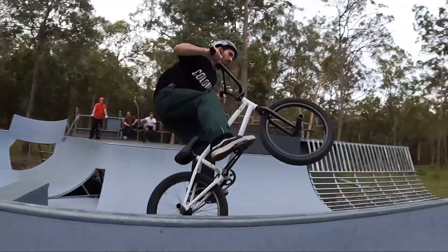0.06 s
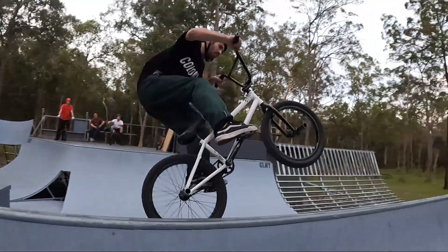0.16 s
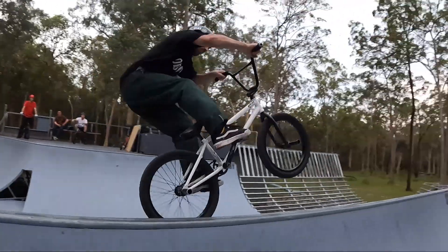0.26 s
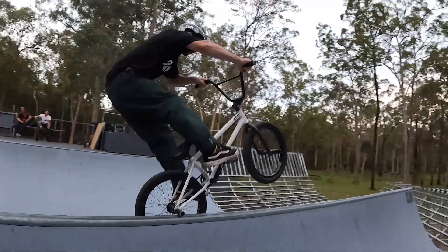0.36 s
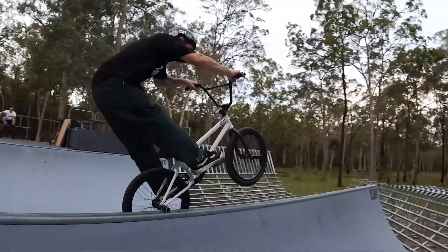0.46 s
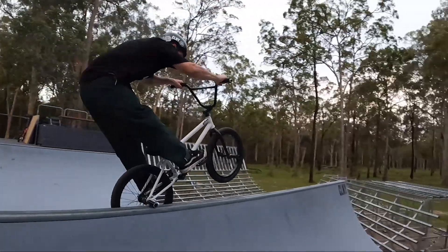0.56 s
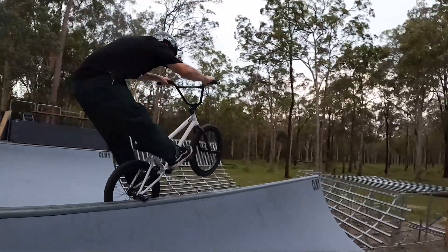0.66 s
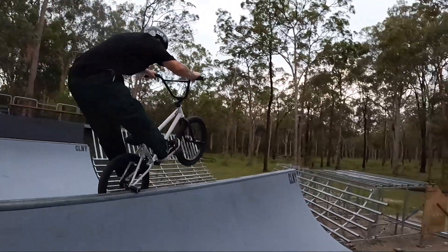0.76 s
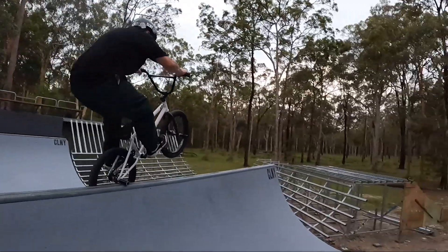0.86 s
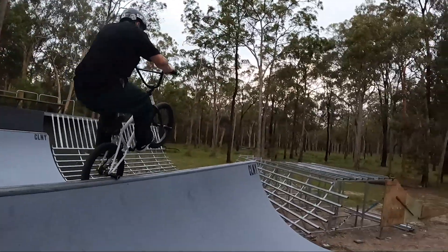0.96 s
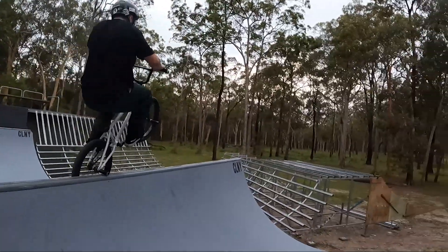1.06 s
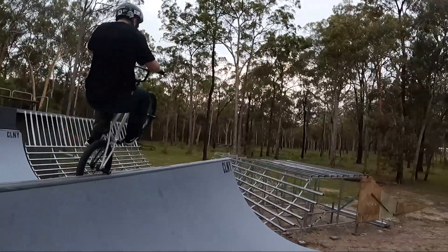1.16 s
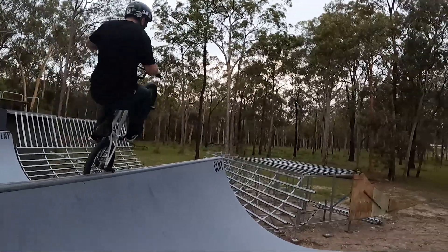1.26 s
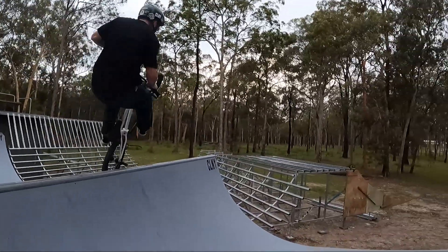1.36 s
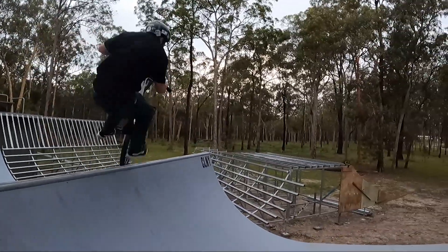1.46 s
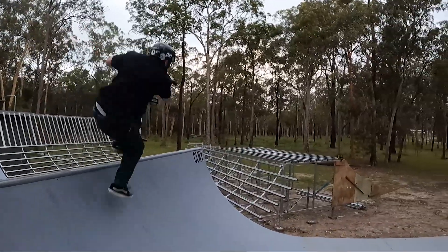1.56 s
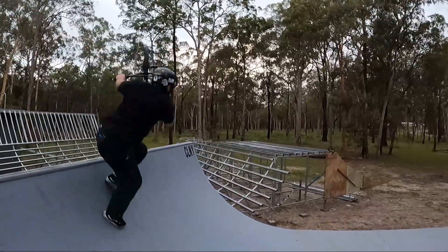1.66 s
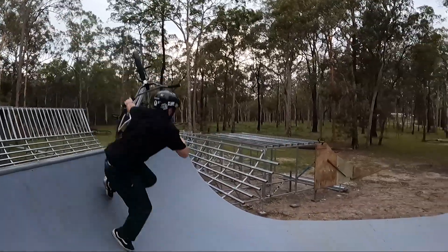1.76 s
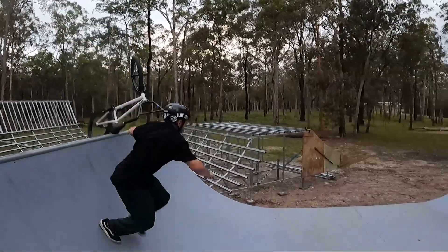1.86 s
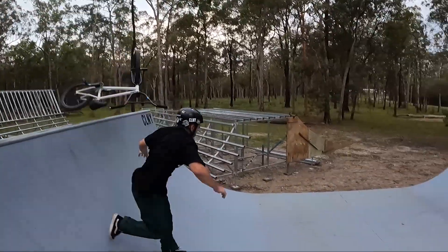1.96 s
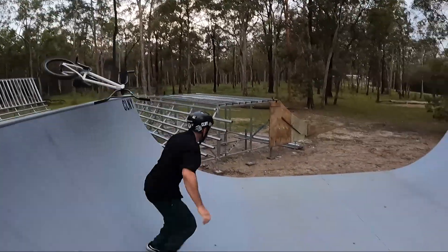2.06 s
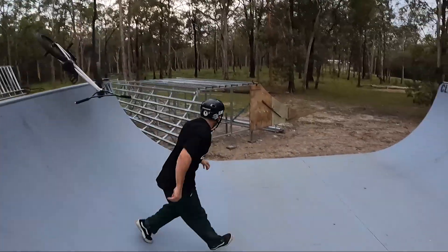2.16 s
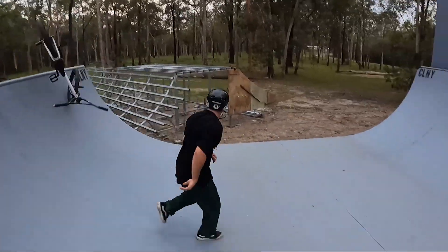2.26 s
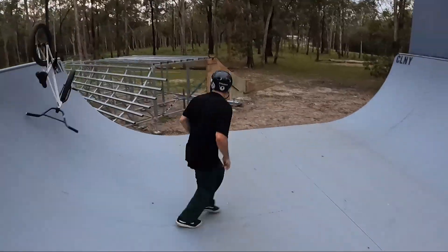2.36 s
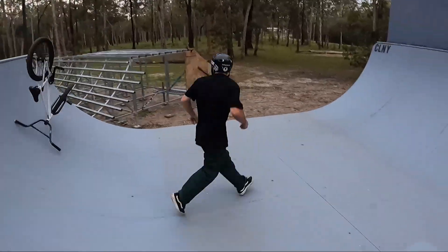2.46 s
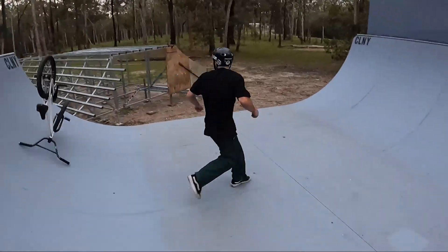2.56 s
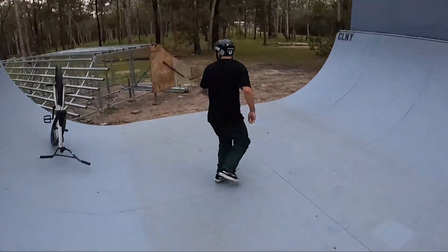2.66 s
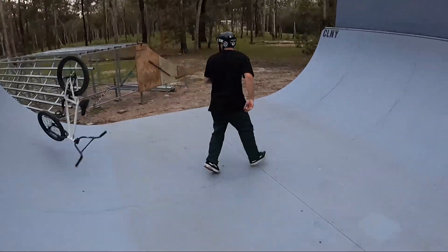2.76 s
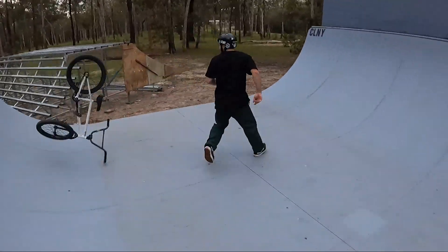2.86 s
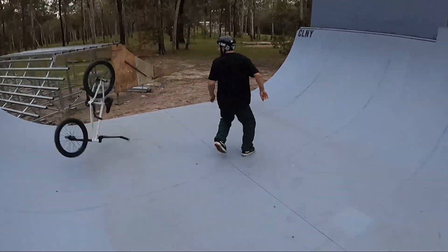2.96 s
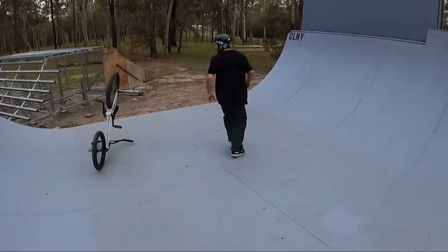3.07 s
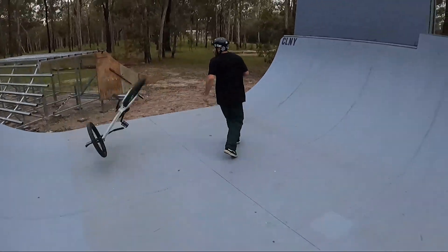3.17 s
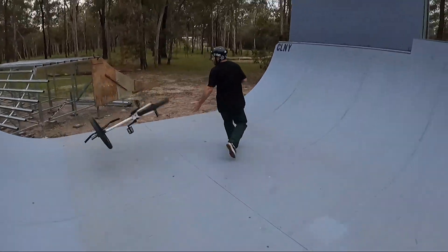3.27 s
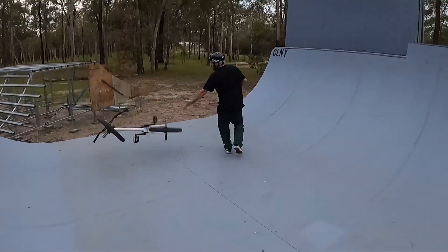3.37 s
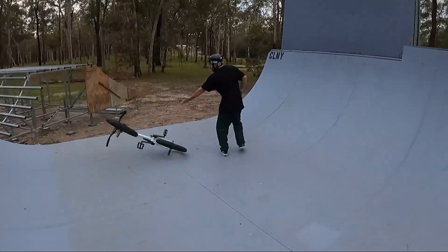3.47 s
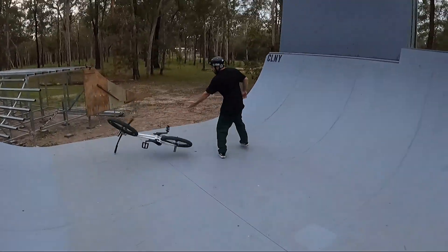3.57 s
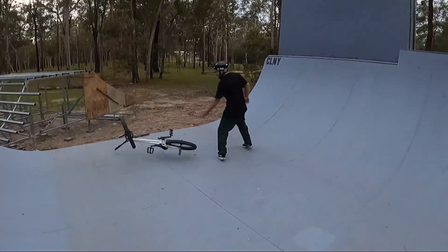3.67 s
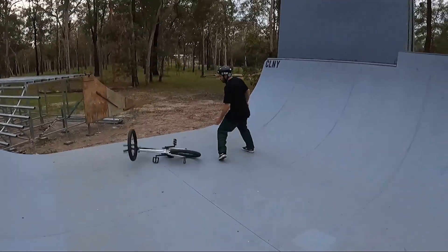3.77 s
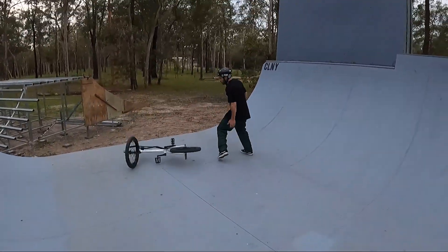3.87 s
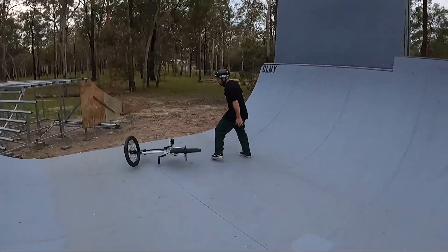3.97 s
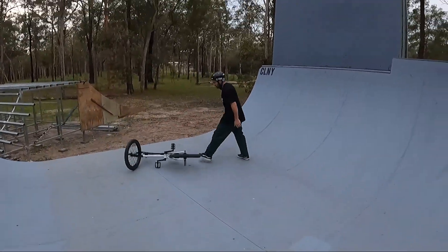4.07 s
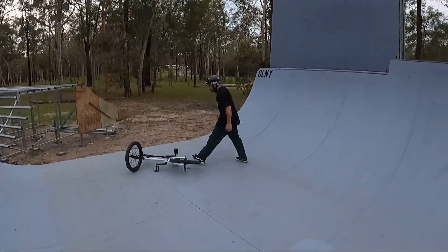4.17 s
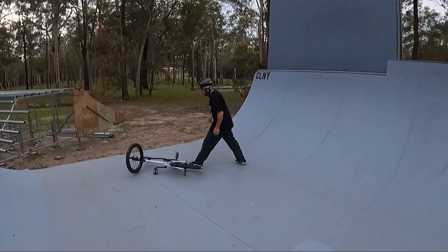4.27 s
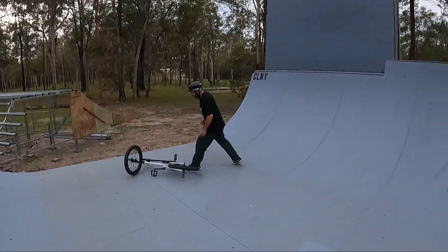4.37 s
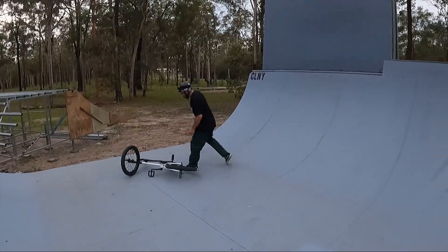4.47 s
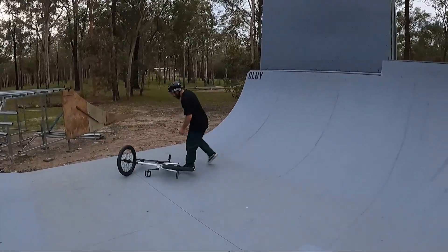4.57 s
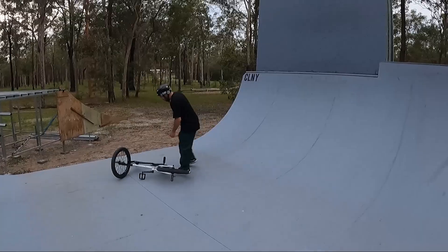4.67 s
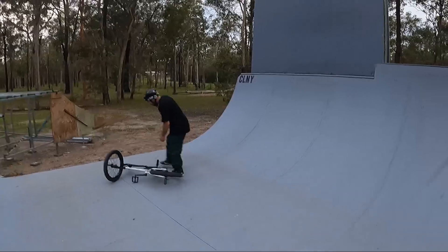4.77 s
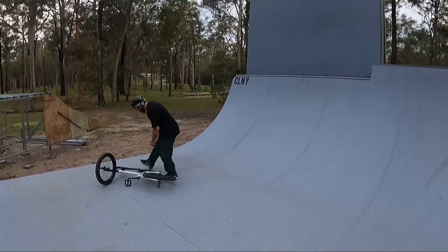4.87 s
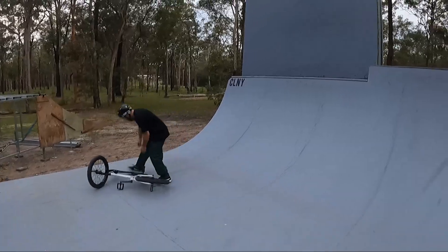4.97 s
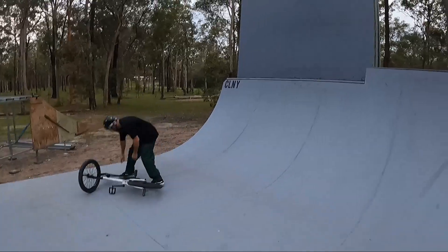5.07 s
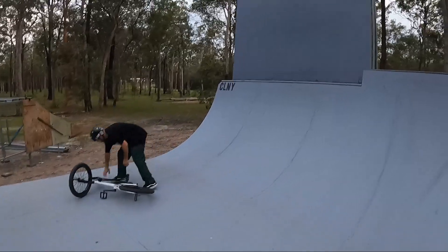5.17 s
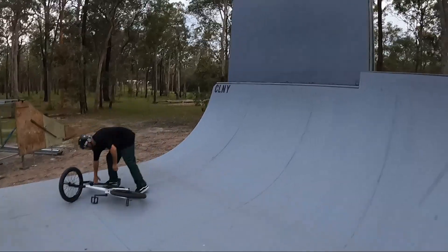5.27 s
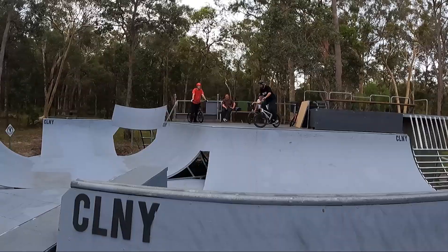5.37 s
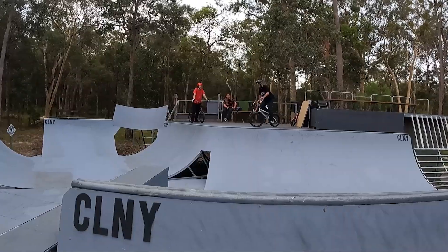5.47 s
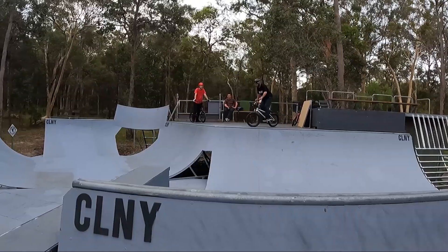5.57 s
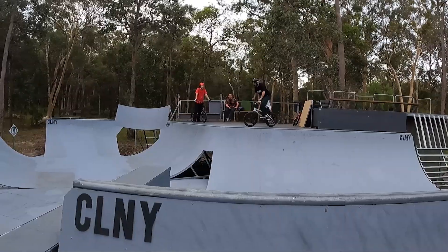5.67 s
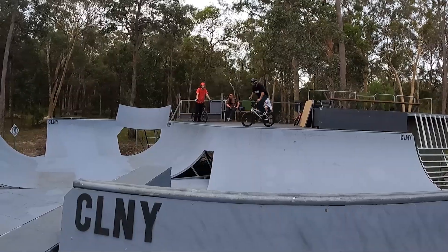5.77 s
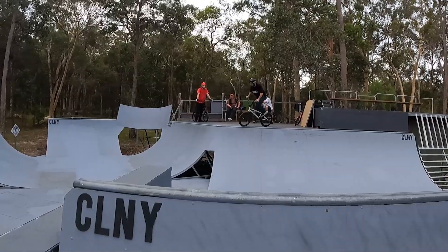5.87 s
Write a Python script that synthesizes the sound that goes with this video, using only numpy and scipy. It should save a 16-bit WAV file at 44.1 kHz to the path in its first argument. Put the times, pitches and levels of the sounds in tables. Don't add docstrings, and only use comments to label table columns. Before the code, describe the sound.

A small bike slaps onto a plywood ramp, squeaks, then gets dropped and tumbles down with hard clattering bangs while cicadas sing faintly.

```python
import sys
import numpy as np
from scipy import signal
from scipy.fft import rfft, irfft, next_fast_len
from scipy.io import wavfile
from scipy.ndimage import uniform_filter1d, minimum_filter1d

SR = 44100
rng = np.random.default_rng(int(sys.argv[2]) if len(sys.argv) > 2 else 0)


def int16_out(signal):
    q = np.round(np.clip(np.atleast_2d(signal).T, -1, 1) * 32767)
    wavfile.write(sys.argv[1], SR, q.astype(np.int16))


def attenuation_scalar(level_db):
    decades = np.asarray(level_db, float) / 20
    return 10 ** decades


N = 261513


def evened(x):
    return x / np.sqrt(np.mean(x ** 2) + 1e-20)


def wavering(noise, size):
    return evened(uniform_filter1d(uniform_filter1d(noise, size=size), size=size))


def read(points, hz):
    f, value = np.transpose(points)
    return np.interp(np.log(hz + .1), np.log(f + .1), value)


def curve(rows):
    s, db = np.transpose(rows)
    return np.interp(np.arange(N) / SR, s, db)


def passing(rows):
    s, db = np.transpose(rows)
    return attenuation_scalar(np.interp(np.arange(N) / SR, s, db, left=-200, right=-200))


def add(mix, s, sound):
    part = mix[round(s * SR):][:len(sound)]
    part += sound[:len(part)]


def coloured(x, spectrum):
    size = next_fast_len(x.shape[-1])
    gain = attenuation_scalar(read(spectrum, np.fft.rfftfreq(size, 1 / SR)))
    return evened(irfft(rfft(x, size) * gain, size)[..., :x.shape[-1]])


def grains(per_s, spread_db):
    present = rng.random(N) < per_s / SR
    size_db = spread_db * np.minimum(rng.exponential(1, N), 4)
    return present * rng.standard_normal(N) * attenuation_scalar(size_db)


def dying(t, t60, rise_s):
    return (1 - np.exp(-t / rise_s)) * attenuation_scalar(-60 * t / t60)


# (time [s], level [dB])
BREEZE = [(0, -28), (.3, -24), (1, -28), (1.7, -39), (2.2, -35), (3.9, -37), (4.6, -24), (5.1, -31.5),
          (5.92, -36)]
# (frequency [Hz], density [dB per Hz])
GUSTS = [(.5, -11.5), (3, -1.5), (6, -2), (12, -23.5), (25, -29.5), (50, -45.5), (120, -66.5), (400, -88)]
CHANGE_S, CHANGE_DB = 5.357, -35


def breeze():
    t = np.arange(N) / SR - CHANGE_S
    before = -.7 * np.exp(np.minimum(t, 0) / 0.044) * (t < 0)
    after = .3 * np.exp(-np.maximum(t, 0) / 0.039) * (t >= 0)
    gusts = attenuation_scalar(curve(BREEZE)) * coloured(rng.standard_normal(N), GUSTS)
    return gusts - attenuation_scalar(CHANGE_DB) * (before + after)


# (time [s], level [dB])
CICADAS = [
    [(0.0, -47.5), (4.54, -53.5), (5.35, -51.5)],
    [(5.362, -46), (5.92, -46.5)],
]
# (frequency [Hz], density [dB per Hz])
CHORUS = [(3300, -50), (3840, -28), (4410, -11), (5360, -36.5), (6020, -6), (6910, 6), (8560, -18),
          (14500, -40)]
# (frequency [Hz], density [dB per Hz])
HUSH = [(60, -40), (150, -30), (700, -47), (1300, -34), (2020, -33), (3040, -24), (3900, -38), (16000, -50)]


def cicadas():
    drift = evened(uniform_filter1d(rng.standard_normal(N), 9000))
    throb_hz = 69 * (1 + 0.015 * drift)
    throb_db = 2.5 * np.cos(2 * np.pi * np.cumsum(throb_hz) / SR)
    clicks = evened(grains(per_s=8400, spread_db=-4.2)) * attenuation_scalar(throb_db)
    song = coloured(clicks + .7 * rng.standard_normal(N), CHORUS)
    hush = attenuation_scalar(-24.5) * coloured(rng.standard_normal(N), HUSH)
    return attenuation_scalar(curve(np.vstack(CICADAS)) - 4.0) * (song + hush)


# (frequency [Hz], t60 [s])
WOODS = [(60, 1), (250, 0.34), (1000, 0.45), (4000, 0.42), (6500, .25), (12000, 0.067)]


def woods(x):
    taps = np.zeros(SR)
    at = np.arange(300, SR - 20, 20)
    taps[at + rng.integers(0, 20, len(at))] = rng.choice([-1., 1.], len(at))
    hz, t, z = signal.stft(taps, SR, nperseg=512)
    decay = attenuation_scalar(-60 * t / read(WOODS, hz)[:, None])
    tail = signal.istft(z * decay, SR, nperseg=512)[1]
    return signal.fftconvolve(x, tail / np.linalg.norm(tail))[:N]


# (time [s], level [dB])
FREEWHEEL = [(1.85, -70), (2.5, -68), (3.2, -62), (3.3, -54), (3.52, -58), (3.62, -53), (3.85, -56),
             (4.35, -68)]
PAWLS_PER_S = 88


def freewheel():
    unevenness = .2 * evened(uniform_filter1d(rng.standard_normal(N), size=2000))
    turns = np.cumsum(PAWLS_PER_S * (1 + unevenness)) / SR
    ticks = (.4 + np.exp(-(turns % 1) / .12)) * rng.standard_normal(N)
    spectrum = [(3000, -22), (5500, -6), (8500, -2), (11000, -4), (15000, -9)]
    return coloured(ticks, spectrum) * passing(FREEWHEEL)


# (frequency [Hz], density [dB per Hz])
RUMBLE = [(15, -33), (30, 11), (70, -6), (130, -15), (250, -20), (500, -52)]
HUM = [(200, -26), (350, -2), (600, -1), (900, -3.5), (1300, -25), (1900, -44)]
SCRAPE = [(900, -11), (1500, -4), (2400, -5), (3500, -7), (5500, -6), (9000, -10.5), (15000, -25.5)]
# (frequency [Hz], width [Hz], level [dB])
TREAD = [(500, 22, 2), (630, 30, -1), (760, 40, -6), (1050, 35, -8), (1560, 35, -8), (1910, 35, -11),
         (2750, 80, -10)]
# (time [s], level [dB])
MOTION = [(0, -64), (.4, -72), (.56, -44), (1.0, -55), (1.3, -47.5), (1.52, -57), (1.76, -70), (1.95, -59),
          (2.41, -54), (2.77, -47), (3.02, -57), (3.33, -45.5), (3.61, -56), (3.86, -53), (4.42, -50),
          (4.62, -66), (5.0, -71), (5.92, -73)]
BAIL_S = 1.76
RIDDEN_DB, DRAGGED_DB = (4, -5, -5), (11, -3.5, -1)
UNLOADED_DB = -8
SWAY_DB, SWAY_T60 = -29, 1.0


def rolling():
    loose = np.clip((np.arange(N) / SR - BAIL_S) * 10, 0, 1)
    motion_db = curve(MOTION)
    rumble_db, hum_db, scrape_db = (
        motion_db + ridden + (dragged - ridden) * loose for ridden, dragged in zip(RIDDEN_DB, DRAGGED_DB))

    sway_power, t = np.zeros(N), np.arange(SR) / SR
    for s, boom_db, _ in SLAPS + THUDS:
        add(sway_power, s, attenuation_scalar(boom_db + 2 * SWAY_DB) * dying(t, SWAY_T60, .03))
    rumble = np.sqrt(attenuation_scalar(2 * rumble_db) + sway_power) * coloured(rng.standard_normal(N), RUMBLE)

    hum, t = coloured(rng.standard_normal(N), HUM), np.arange(4096) / SR
    for hz, width, db in TREAD:
        wander = attenuation_scalar(2.0 * evened(uniform_filter1d(rng.standard_normal(N), 4000)))
        mode = np.sin(2 * np.pi * hz * t) * np.exp(-np.pi * width * t)
        rung = evened(signal.oaconvolve(grains(per_s=300, spread_db=2), mode)[:N])
        hum = hum + attenuation_scalar(db - 5 + UNLOADED_DB * loose) * wander * rung

    scrape = coloured(grains(per_s=7600, spread_db=0.5), SCRAPE)
    return rumble + attenuation_scalar(hum_db) * hum + attenuation_scalar(scrape_db) * scrape


# (start [s], hardest [s], end [s], level [dB], level at both ends [dB])
SKIDS = [(.28, .47, .48, -56, -70), (1.21, 1.226, 1.3, -47, -63), (1.36, 1.406, 1.44, -42, -72),
         (1.725, 1.81, 1.87, -33, -43), (5.09, 5.13, 5.3, -68, -78)]


def skids():
    spectrum = [(800, -14), (1700, 1), (2500, 3.5), (3600, -1), (6000, -13), (11000, -23.5), (15000, -29.5)]
    grit = coloured(grains(per_s=4400, spread_db=1.0), spectrum)
    out = np.zeros(N)
    for start, hardest, end, db, ends_db in SKIDS:
        t = np.arange(start, end, 1 / SR)
        pressure = attenuation_scalar(np.interp(t, [start, hardest, end], [ends_db, db, ends_db]))
        add(out, start, pressure * signal.windows.tukey(len(t), .15))
    return out * grit


# (time [s], level [dB])
GRIND = [(1.385, -56), (1.42, -41), (1.432, -60)]


def grind():
    spectrum = [(3000, -16.5), (5500, 9), (9000, 8), (11000, -5), (14000, -2)]
    return coloured(grains(per_s=5000, spread_db=2.8), spectrum) * passing(GRIND)


# (time [s], hold [s], settled pitch [Hz], level [dB], first grip above that pitch [Hz])
SQUEAKS = [(.376, .042, 5680, -33, -120), (.527, .014, 4900, -39, 900), (1.122, .012, 5780, -44, 600),
           (1.204, .006, 5820, -32, 350), (1.283, .008, 5990, -36, 450), (1.879, .001, 5200, -46, 220),
           (2.352, .001, 5350, -38, -400), (2.364, .001, 5160, -38, 80)]
GRIP_S, GRIP_DB, LET_GO_DB_PER_S = .006, -22, 2200
SETTLE = .4


def squeaks():
    out, t = np.zeros(N), np.arange(4096) / SR
    for s, hold, hz, db, grip_hz in SQUEAKS:
        noise = rng.standard_normal((3, len(t)))
        grip = GRIP_S + .15 * hold
        end = grip + hold
        waver, flutter = (wavering(v, 30) for v in noise[:2])
        stutter = evened(uniform_filter1d(noise[2], size=300))
        pitch_hz = (hz + grip_hz * np.exp(-t / (SETTLE * end))) * (1 + 0.015 * waver)
        turn = 2 * np.pi * np.cumsum(pitch_hz) / SR
        octave = attenuation_scalar(-28) * np.sin(2 * turn) * np.clip(1 + 0.55 * flutter, 0, 3)
        shape_db = GRIP_DB * np.maximum(1 - t / grip, 0) - LET_GO_DB_PER_S * np.maximum(t - end, 0)
        level = attenuation_scalar(db + shape_db + 9.5 + 0.6 * flutter + 2.5 * stutter)
        add(out, s, level * (np.sin(turn) + octave) * np.minimum(t * 1000, 1))
    return out


LANDING_S = .479
# (frequency [Hz], level [dB], t60 [s])
TUBES = [(1500, -13, .06), (1770, -8, .07), (2060, -13, .099), (4980, -21.5, .15), (7290, -14, .068),
         (13180, -22, .07), (1594, -53, 1.5), (2720, -52, 1.2), (4750, -42, .94)]
# (time
# [s], frequency [Hz], level [dB], t60 [s])
TAPS = [(2.958, 178, -15, .16), (.301, 2580, -56, .025), (.366, 385, -51, .38), (.74, 4900, -45, .17),
        (.841, 2420, -45, .025), (1.235, 4820, -47, .44), (1.419, 7200, -30.5, .081),
        (1.425, 12060, -51, .3), (1.717, 564, -19, .03), (1.749, 957, -16.5, .017),
        (1.864, 926, -26.5, .02), (2.54, 121, -14, .4), (3.11, 180, -15, .15), (3.668, 5680, -38, .046),
        (1.395, 310, -42, .12), (3.961, 1790, -52.5, .072), (4.5, 101.9, -39.5, 2.24),
        (4.964, 2100, -35, .007), (4.964, 3200, -41, .007), (5.058, 430, -44, .05), (5.175, 467, -50, .032),
        (5.278, 4900, -63, .065), (5.296, 5350, -57, .06), (.53, 1030, -44, .9), (.53, 640, -41, 1.2),
        (.6, 510, -45, 1.5), (1.215, 500, -44, .5), (1.29, 490, -42, .6), (1.24, 175, -40, .12),
        (1.245, 900, -48, .1), (1.41, 135, -40, .1), (1.4, 560, -42, .1), (1.37, 1550, -50, .3),
        (1.62, 610, -58, .8), (3.11, 800, -15, .06), (3.27, 610, -45, .9), (3.563, 4867, -30, .25),
        (3.563, 393, -21, .24), (3.563, 258, -16, .3), (3.728, 4500, -51, .12), (4.589, 700, -40, .04),
        (4.69, 930, -64, .6), (2.118, 248, -14, .18), (2.118, 151, -20, .45), (.8, 1520, -59, .8),
        (.49, 155, -20, .55), (.485, 250, -12, .2), (2.542, 358, -13, .16), (2.59, 128, -18, .2),
        (2.352, 200, -24, .15), (2.114, 950, -20, .04), (5.062, 320, -54, .12), (1.28, 300, -48, .15),
        (3.24, 2112, -50, 4), (3.24, 4511, -50, 1.1)]
RATTLES = [(1.228, 2900, -41, .06), (1.403, 4740, -40, .06), (1.415, 13620, -40, .063),
           (3.562, 420, -12, .12), (3.565, 4544, -37, .13), (3.113, 9000, -33, .06),
           (3.177, 9000, -25, .02), (3.168, 5600, -24, .04), (3.237, 1450, -22, .1), (3.2, 511, -22, .15),
           (3.2, 2374, -24, .075), (.505, 1800, -22, .06), (.53, 2650, -54, .8), (.53, 5200, -47, .5),
           (4.6, 580, -63, 1.2)]
TIGHT, LOOSE = .18, .7


def frame():
    out, longest = np.zeros(N), 2 * SR // 3
    landing = [(LANDING_S, *mode) for mode in TUBES]
    for rows, rough in (landing + RATTLES, LOOSE), (TAPS, TIGHT):
        for s, hz, db, t60 in rows:
            t = np.arange(min(longest, 2048 + round(t60 * SR))) / SR
            a, b = (wavering(v, round(90 / rough)) for v in rng.standard_normal((2, len(t))))
            shake = 1 - rough + rough * (a + 1j * b) * 1.6
            ring = (shake * np.exp(2j * np.pi * hz * t)).imag
            add(out, s, attenuation_scalar(db) * ring * dying(t, t60, 0.00072))
    return out


# (frequency [Hz], level [dB], t60 [s])
PANELS = [(45, -4, .4), (71.8, -6.5, 0.69), (96, -1.5, 0.43), (120.4, 1.5, 0.23), (155, 0, 0.31),
          (200.6, -4, .3), (234, 4, 0.13), (289.5, -6.5, 0.39), (324.8, 6.5, 0.14), (365, 5.5, 0.09),
          (392.8, -2.5, .2), (496, 3, 0.071)]
# (time [s], boom level [dB], boom centre [Hz])
SLAPS = [(.478, -16, 363), (.482, -14, 110), (1.751, -16.5, 316), (1.797, -10.5, 308), (2.09, -26, 200),
         (2.115, -6, 270), (2.319, -27, 223), (2.494, -12, 335), (2.541, -2, 361), (2.562, -12, 311),
         (2.605, -19, 309), (2.615, -9, 342), (2.691, -22, 202), (2.701, -6, 321), (2.734, -10.5, 326),
         (2.958, -14, 321), (3.109, -14.5, 330), (3.868, -30, 355), (4.084, -23, 190), (4.301, -35, 207),
         (4.335, -23, 226)]
THUDS = [(0, -38, 77), (.504, -15, 120), (1.715, -30, 128), (1.866, -27, 126), (1.966, -35, 131),
         (2.2, -27, 140), (2.347, -19.5, 83), (3.157, -14, 170), (3.191, -8.5, 190), (3.248, -21, 230),
         (3.558, -5, 140), (3.664, -14, 86), (3.88, -10, 140), (3.9, -20, 87), (4.154, -21, 175),
         (4.215, -27.5, 97), (4.327, -25, 132), (4.44, -24.5, 113), (4.504, -29.5, 86), (4.563, -39, 250)]
BOOM_DB = 2.5
HELD, FREED_PER_DB = .6, .025


def booms():
    out, t = np.zeros(N), np.arange(SR // 3, dtype=np.float32) / SR
    hz, db, t60 = np.transpose(PANELS)[:, :, None]
    for s, boom_db, centre_hz in SLAPS + THUDS:
        chance = rng.random((3, len(PANELS), 1))
        octaves = abs(np.log2(hz / centre_hz))
        share = attenuation_scalar(db - 6 * octaves + 9 * np.exp(-(octaves / .13) ** 2) + 2.5 * chance[0])
        wave = np.sin(2 * np.pi * (hz * (.985 + 0.04 * chance[1]) * t + chance[2]))
        lasts = t60 * np.clip(HELD - FREED_PER_DB * boom_db, .2, .9)
        ring = (share * wave * dying(t, lasts, 0.0045)).sum(0) / np.linalg.norm(share)
        add(out, s, attenuation_scalar(boom_db + BOOM_DB) * ring * np.cos(1.5 * np.pi * t))
    return out


# (frequency [Hz], density [dB per Hz])
CRACK = [(1500, -31.5), (2500, -5), (3700, -10.5), (7200, -11.5), (9000, -12), (10500, -16), (13000, -15.5),
         (16000, -29.5)]
KNOCK = [(300, -5.5), (600, 7.5), (1000, 4), (1800, 2), (2800, -6), (4500, -38.5)]
# (time [s], crack level [dB], knock level [dB], t60 [s])
WHEELS = [(.4783, 0, -14.5, .055), (.4856, -18, -15.5, .045), (.5032, -22, -19, .1),
          (.7166, -41.5, -42, .066), (.7432, -38, -41, .064), (.8434, -40, -61, .045)]
SHOES = [(1.7174, -40, -39, .037), (1.7497, -24, -23, .036), (1.7982, -31, -29, .054),
         (1.8646, -39, -31, .017), (1.9613, -40, -46, .078)]
PEDALS = [(1.2281, -40, -41, .056), (1.4198, -31, -44, .047), (2.1136, -12, -15, .023),
          (2.348, -23, -28, .038), (2.356, -20, -28, .06), (3.9002, -15, -13.5, .043)]
BAR_ENDS = [(2.5399, -4, -8, .049), (2.5644, 10, -9, .023), (2.5704, -6, -18.5, .056),
            (2.607, -7, -20.5, .049), (2.6132, -14.5, -20.5, .07), (2.6954, 2.5, -12, .028),
            (2.7019, -12.5, -17, .12), (2.7354, -9.5, -27, .029), (2.7412, -16.5, -22, .087),
            (2.9571, -15, -15.5, .075), (2.768, -26, -32, .06)]
CRANKS = [(3.1145, -19, -18, .06), (3.1665, -24, -22, .05), (3.197, -19, -19, .06), (3.2105, -23, -28, .03),
          (3.2369, -5, -12, .028), (3.2484, -19, -21, .07), (3.2555, -25, -24, .08),
          (3.5655, -20, -10, .04), (3.6685, -24, -22, .05), (4.0955, -26, -30, .05),
          (4.1745, -32, -32, .06)]
SEAT = [(2.4921, -12, -18, .04), (2.9968, -28, -27, .04), (3.1092, -4, -8, .035),
        (3.8936, -6.5, -17.5, .036)]
AXLES = [(3.1601, 2, -13, .026), (3.1918, 8, -10, .026), (3.5596, 7, -3, .027)]
SETTLING = [(3.663, -21, -15, .069), (3.8686, -12, -14.5, .056), (3.8819, -12, -15.5, .092),
            (4.0844, -14.5, -28, .061), (4.1542, -23, -25, .087), (4.5277, -50, -39.5, .094),
            (4.3251, -18.5, -19.5, .088), (4.3358, -19, -34, .062)]
ROCKING = [(4.141, -35, -35, .079), (4.2162, -30, -35, .084), (4.3012, -23, -26, .06),
           (4.422, -33, -34, .034), (4.4378, -18, -20, .065), (4.562, -37.5, -33, .073)]
# (its blows, crack centre [Hz], top edge against the crack [dB])
PARTS = [(WHEELS, 4950, -15), (SHOES, 4200, -27), (PEDALS, 5100, -14), (BAR_ENDS, 7300, -22), (SEAT, 4400, -19),
         (AXLES, 6150, -21), (SETTLING, 5300, -29), (ROCKING, 3900, -34), (CRANKS, 2900, -14)]
FAR_FROM_S, FAR_TO_S = 2.4, 3.05
BEND_S = 0.003016


def blows():
    near_far, t = np.zeros((2, N)), np.arange(6144) / SR
    hz = np.geomspace(1000, 17000, num=40)
    for rows, centre_hz, edge_db in PARTS:
        broad = read(CRACK, hz) + (edge_db + 16) * np.clip(np.log2(hz / 7500) / .5, 0, 1)
        peaked = broad + 13 * np.exp(-(np.log2(hz / centre_hz) / .28) ** 2)
        for s, crack_db, knock_db, t60 in rows:
            noise, lasts = rng.standard_normal((3, len(t))), np.clip(t60, .01, .25)
            shape = dying(t, lasts, .0005) + attenuation_scalar(-13.5) * dying(t, 3.6 * lasts, .006)
            snap = coloured(noise[0], np.c_[hz, peaked]) * dying(t, 0.5 * lasts, 0.0004)
            crack = coloured(noise[1], np.c_[hz, broad]) * shape
            knock = coloured(noise[2], KNOCK) * (shape + attenuation_scalar(-0.5) * dying(t, .012, .0003))
            blow = attenuation_scalar(crack_db - 5) * snap + attenuation_scalar(crack_db - 17.5) * crack + attenuation_scalar(knock_db - 4.5) * knock
            add(near_far[int(FAR_FROM_S < s < FAR_TO_S)], s, blow)
    near, far = near_far
    size = next_fast_len(N, real=True)
    hz = np.fft.rfftfreq(size, 1 / SR)
    lag = 2 * BEND_S * np.sqrt(1000 * hz) - BEND_S * np.sqrt(1 / 6) * hz
    return near + irfft(rfft(far, size) * np.exp(-2j * np.pi * lag), size)[:N]


# (frequency [Hz], side minus mid [dB])
APART = [(60, -44), (300, -44), (700, -33), (1400, -33), (2800, -25), (5600, -31), (10000, -23),
         (15000, -19)]


def scene():
    background = breeze() + cicadas() + freewheel() + rolling()
    near = skids() + grind() + squeaks() + frame() + blows()
    low = booms()
    mid = background + near + low + attenuation_scalar(-23) * woods(near) + attenuation_scalar(-16.5) * woods(low)
    size = next_fast_len(N, real=True)
    apart = 1j * attenuation_scalar(read(APART, np.fft.rfftfreq(size, 1 / SR)))
    side = irfft(apart * rfft(mid, size), size)[:N]
    return np.array([mid + side, mid - side])


def low_pass(x):
    return signal.sosfilt(signal.butter(12, 16410, fs=SR, output="sos"), x)


def record(dry):
    edge = signal.firwin(255, 16000, window=("kaiser", 7), fs=SR)
    cut = signal.oaconvolve(dry, edge[None], "same")
    room = np.minimum(1.35 / (abs(cut).max(0) + 1e-9), 1)
    gain = uniform_filter1d(minimum_filter1d(room, size=129), size=65)
    mix = np.clip(cut * gain, -.97, .97)
    return low_pass(mix)


dry = scene()
out = record(dry)
int16_out(out)
```